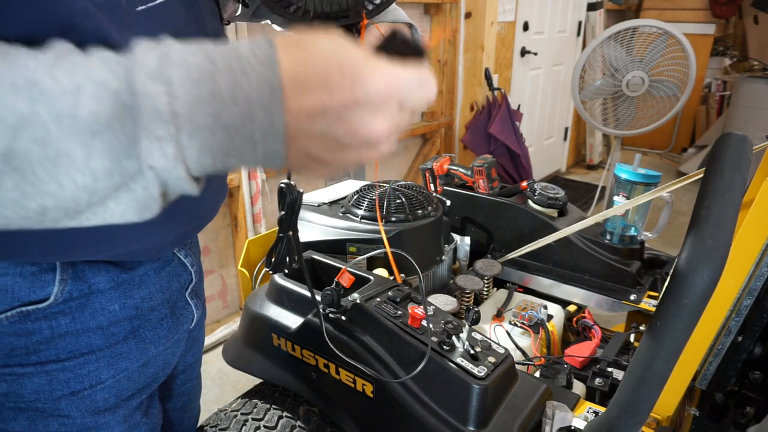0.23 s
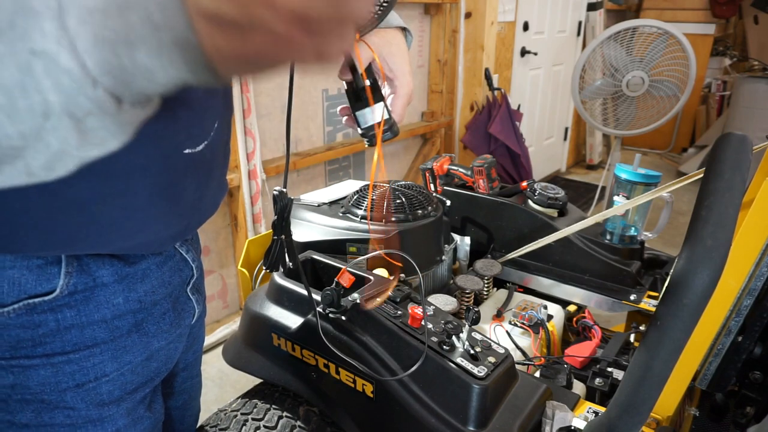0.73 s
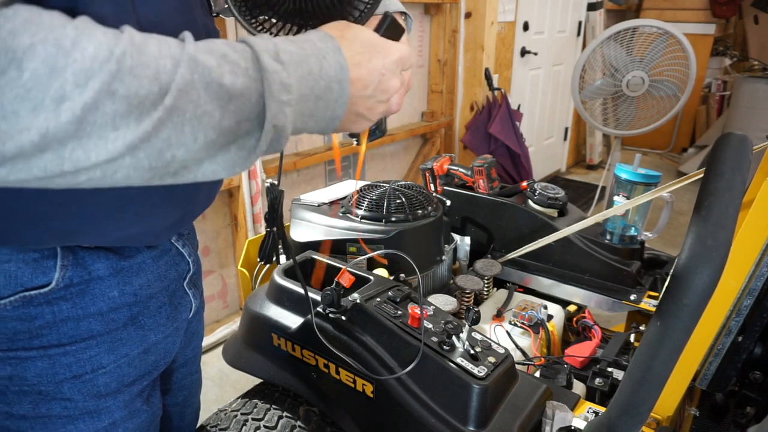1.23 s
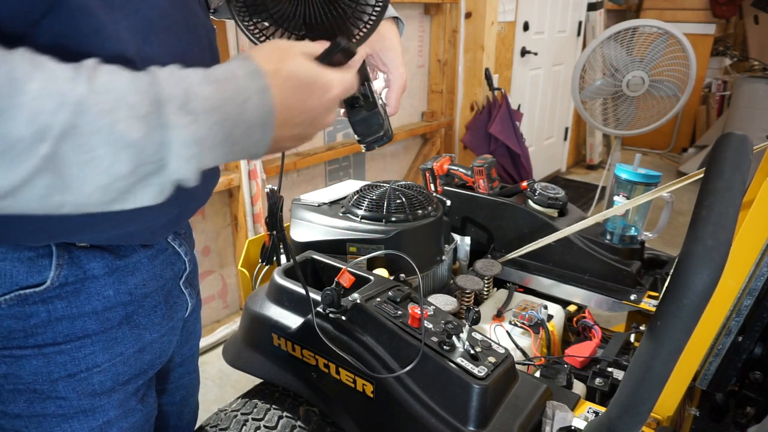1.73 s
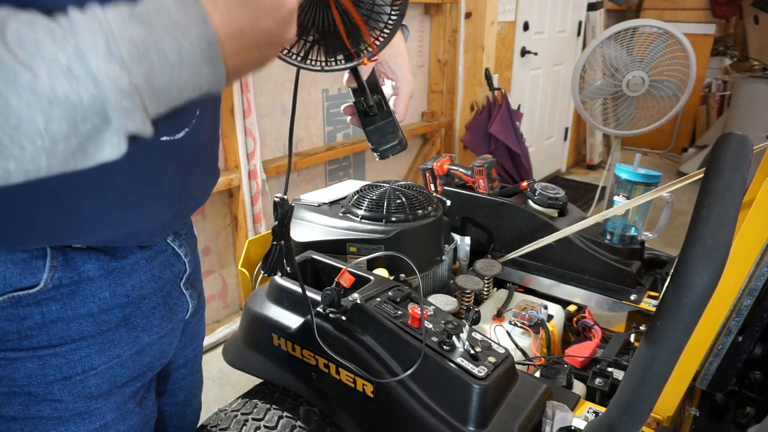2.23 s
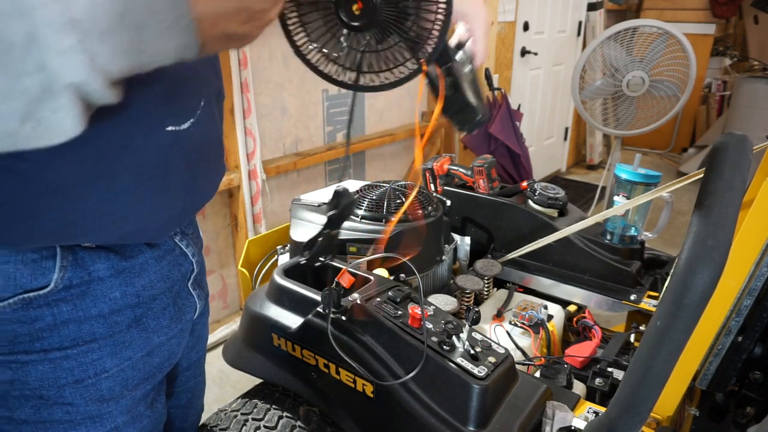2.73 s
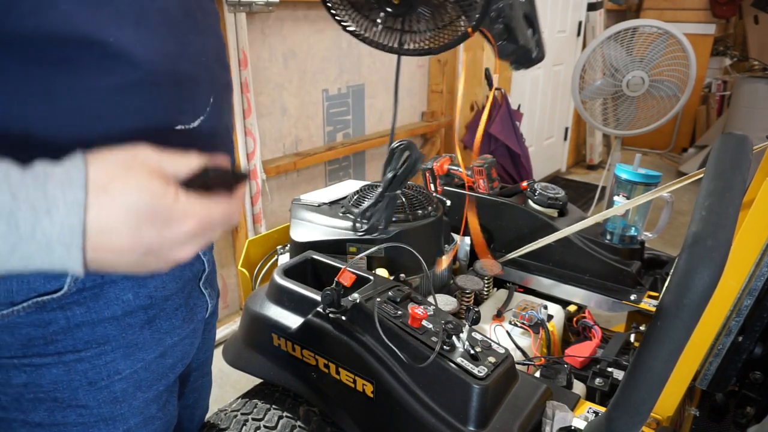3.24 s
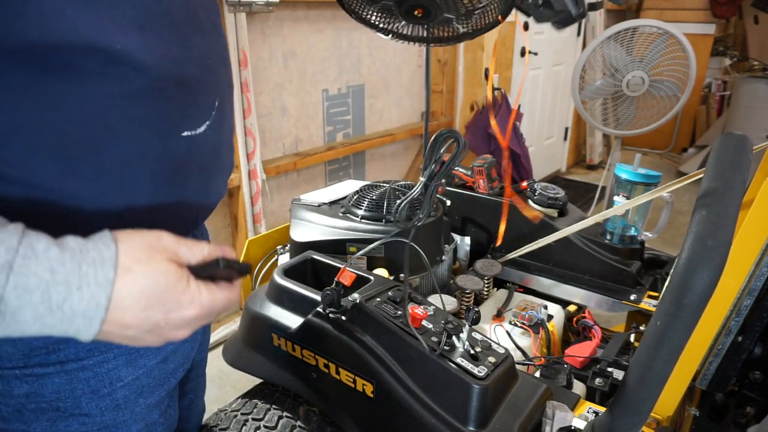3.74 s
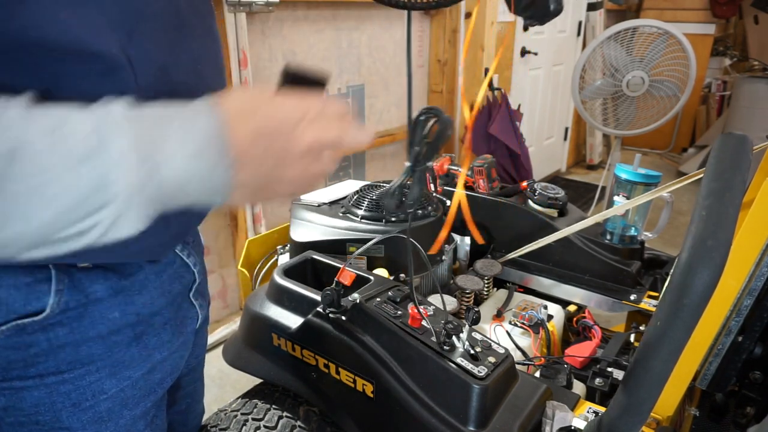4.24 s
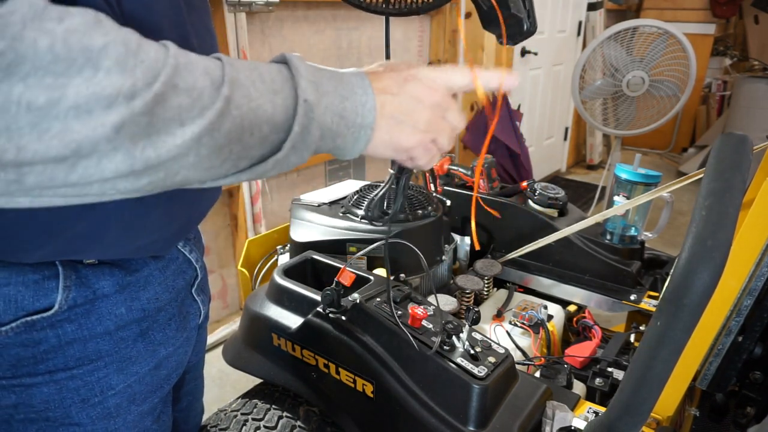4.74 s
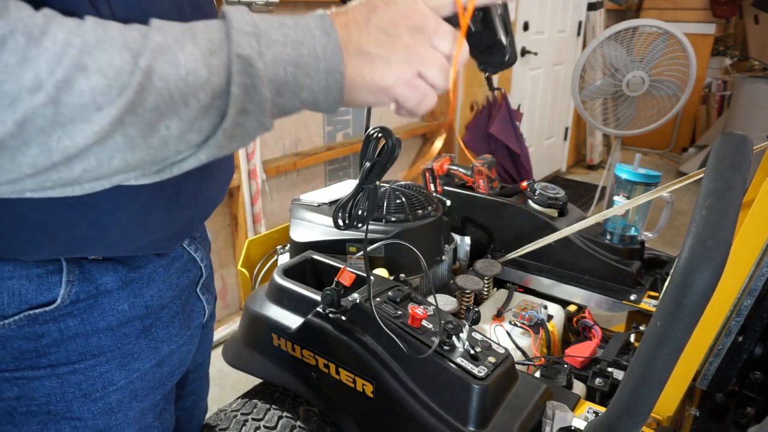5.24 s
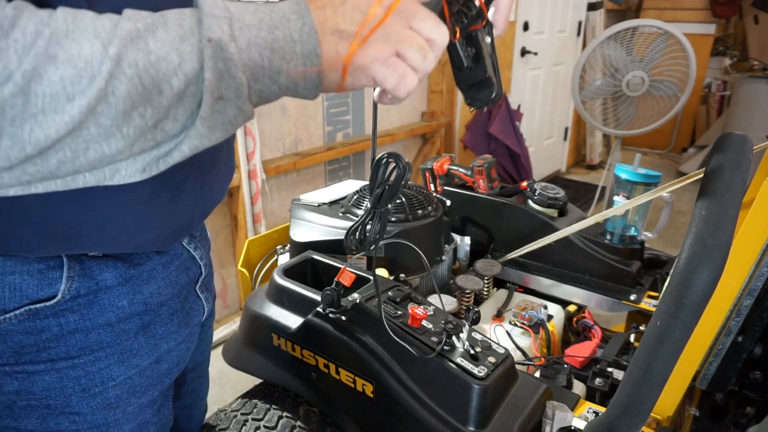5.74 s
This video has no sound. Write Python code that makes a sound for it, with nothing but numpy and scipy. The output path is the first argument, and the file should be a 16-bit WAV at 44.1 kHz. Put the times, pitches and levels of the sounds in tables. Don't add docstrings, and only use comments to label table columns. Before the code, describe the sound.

A small handheld electric fan runs throughout, close to a stereo microphone in a garage. Airy blade hiss covers a faint motor hum, a fast dry ticking and a nasal drone that swells irregularly. Two small plastic clicks come in the first second and a half; around two and three seconds the airstream thumps low against the microphone. Afterwards the hiss is brighter and nearer.

```python
import sys
import numpy as np
from scipy import signal
from scipy.fft import rfft, irfft
from scipy.io import wavfile
from scipy.ndimage import uniform_filter1d

SR = 44100
rng = np.random.default_rng(int(sys.argv[2]) if len(sys.argv) > 2 else 0)


def wrap_up_sound(samples):
    columns = np.atleast_2d(samples).T
    tamed = np.clip(columns, -1, 1)
    steps = np.round(tamed * 32767).astype(np.int16)
    wavfile.write(sys.argv[1], SR, steps)


def volts_from_db(level):
    exponent = np.asarray(level, float) / 20
    return 10 ** exponent


N = 263277
T = np.arange(N) / SR

# t/s, air level/dB, treble of the air/dB, left over right/dB
FACING = [(0, -46.5, -48.5, 3.5), (.3, -47, -50.5, 4), (.6, -44, -53, 3), (.95, -46, -53.5, 3.5),
          (1.3, -45.5, -48.5, 4), (1.6, -43.5, -50, 4.5), (2.0, -45, -48, 4), (2.6, -44.5, -51, 2),
          (2.82, -43.5, -51, 2), (3.05, -41.5, -47, 2.4), (3.5, -45, -49, 1), (4.0, -46.5, -50, 1.5),
          (4.28, -41, -44, 2), (4.9, -40.5, -47, 2), (5.2, -40.5, -47, 1), (5.55, -42.5, -48.5, 1.7),
          (5.97, -41, -47.5, 1.2)]
# f/Hz, density/dB
AIR_AWAY = [(20, -41), (120, -40), (270, -24.5), (355, -13.5), (432, -15.5), (520, -8.5), (1000, 2.5),
            (1150, -2), (1900, -1), (3600, -3), (4600, -8), (5000, -12), (7050, -22), (9300, -19)]
# f/Hz, density/dB
AIR_NEAR = [(20, -35), (120, -38), (277, -26.5), (489, -11.5), (900, -4.5), (1280, -5.5), (1810, -0.5),
            (2050, -5.5), (2600, -4), (3400, -6.5), (4600, -9), (5000, -13.5), (7230, -23), (9300, -20.5)]
# t/s, shadow level/dB
SHADOW = [(0, -4.5), (.95, -6.5), (3.0, -6), (3.85, -7.5), (4.3, -6.5), (5.97, -6)]
# f/Hz, correlation/1
SAME = [(60, 0.94), (130, 0.86), (270, 0.54), (570, 0.57), (1220, 0.78), (2590, 0.91), (5500, 0.59),
        (11700, 0.3)]
# f/Hz, left over right/dB
LEAN = [(60, -0.5), (170, -0.5), (490, 1.5), (1420, 0), (4070, 4), (11700, -0.5)]

SHAFT_HZ = 41.15
# t/s, lag/turns
SHAFT_LAG = [(0.0, 0.03), (0.6, 0.085), (1.1, 0.165), (1.5, 0.18), (2.15, 0.28), (2.45, 0.275),
             (3.05, 0.37), (3.8, 0.385), (4.25, 0.3), (4.75, 0.26), (5.15, 0.185), (6.0, 0.192)]
# shaft order/1, early level/dB, late level/dB
TONES = [(3, -93, -93), (15, -68, -71), (21, -63, -61), (22, -68, -58), (25, -63, -62), (34, -70, -63),
         (37, -68, -64), (39, -62, -59), (42, -64, -59), (45, -62, -54), (54, -62, -64), (60, -60, -57),
         (110, -72, -64), (111, -72, -62)]
# start t/s, length/s, shaft order/1, level/dB
GRIPS = [(-.15, .5, 9, -58.5), (.55, .17, 9, -62), (1.0, .18, 9, -66), (1.5, .15, 9, -60),
         (2.7, .2, 9, -66), (3.07, .2, 9, -59), (-.3, 1.75, 12, -63.5), (1.5, .7, 12, -63),
         (2.15, .45, 12, -53), (2.4, .55, 12, -57), (4.4, .22, 12, -61), (5.05, .3, 12, -60.5),
         (5.48, .4, 12, -64)]

# start t/s, length/s, peak level/dB, centre f/Hz
SWELLS = [(0.0, 0.063, -43.5, 965), (0.464, 0.14, -47, 956), (0.668, 0.32, -45, 985),
          (1.39, 0.11, -47, 1020), (1.558, 0.4, -43, 1014), (2.25, 0.13, -46.5, 1004),
          (2.465, .25, -38, 1017), (2.696, 0.24, -48, 1066), (3.085, .3, -41.5, 900),
          (3.304, 0.51, -44, 1000), (4.16, 0.13, -46, 1010), (4.27, .36, -42.5, 1000),
          (4.658, 0.083, -41, 1070), (4.998, 0.52, -45.5, 1030), (5.43, 0.23, -43.5, 1080),
          (5.75, 0.38, -44, 918)]
DRONE_REST_DB, DRONE_REST_HZ = -57.5, 985

# place/turns, then level/dB in the snap, cage, low cage, rim
TOUCHES = [
    (0, 14.5, 4, 8, 10.5),
    (.13, -2, -12, -10, -5.5),
    (.35, -10.5, -14, -12, 3),
    (.46, -41, -16, -22, -4),
    (0.719, -7.5, 4, -6, -17),
    (.87, 1.5, 0, -0.5, -6),
]
# part/1 (0 snap, 1 cage, 2 rim), f/Hz, width/Hz, level/dB, lag/turns, scrape length/s
TICK_MODES = [
    (0, 9350, 850, 0, -.025, 0.0005),
    (1, 4430, 680, -0.5, 0.0089, 0.00067),
    (1, 2100, 1100, -4, 0.00083, 0.00073),
    (2, 5900, 1570, 0.5, -0.0153, 0.00065),
]
# t/s, level/dB
SNAP = [(.2, -58.5), (.64, -60.5), (1.12, -61.5), (1.44, -50.5), (1.78, -55), (1.95, -62), (2.24, -58.5),
        (2.6, -72), (3.0, -54), (3.22, -62), (3.5, -57), (3.97, -51.5), (4.08, -62), (4.6, -59),
        (4.9, -51.5), (5.28, -52.5), (5.42, -50), (5.97, -58.5)]
# t/s, peak level/dB
SHARP = [(0.7472, -57), (0.7544, -66), (1.3374, -64), (1.3624, -66), (1.4611, -62), (1.5015, -63),
         (1.5344, -62), (1.5828, -63), (1.7789, -61), (1.8294, -73), (3.8965, -62), (3.9444, -64),
         (3.9674, -61), (3.9898, -55), (4.0168, -52), (4.8618, -84), (4.9377, -57), (5.1058, -57),
         (5.1257, -61), (5.2994, -66), (5.3981, -65), (5.4226, -64), (5.4465, -59), (5.5204, -66)]
CAGE_AWAY_DB, CAGE_NEAR_DB, RIM_DB, RING_WAVER_DB = -53, -49.5, -56.5, 1.2
RIM_FOLLOWS, CAGE_FOLLOWS = 0.77, .25
TURN_S, TURN_LENGTH_S = 2.54, 0.44
EDGE_HZ = 11050

# t/s, peak level/dB
CLICKS = [
    (0.7482, -24),
    (1.2939, -25),
]
# f/Hz, level/dB, decay by 60 dB/s
CLICK_MODES = [
    [(1010, 2, 0.037), (4800, -3, .006), (8300, -2, 0.0065), (10900, -4, .005), (11800, -8, .004)],
    [(3910, 5, 0.034), (4450, -4, 0.051), (2330, -2.5, 0.037), (6300, -6, .015), (5300, 0, .015)],
]

# start t/s, length/s, level/dB
GUSTS = [
    (2.095, 0.31, -39.5),
    (2.364, 0.093, -44),
    (2.414, 0.24, -47),
    (2.825, 0.24, -37.5),
    (3.027, 0.37, -68),
    (3.298, 0.4, -73),
    (3.527, 0.093, -69),
    (5.74, 0.71, -67),
]
# f/Hz, density/dB
GUST_COLOUR = [(20, -30), (45, -15), (90, 1.5), (150, 0), (250, -4), (330, -7), (450, -14), (650, -28),
               (1000, -30), (2000, -69)]
# t/s, left port lag/ms
CROSSING = [
    (2.18, 0.82),
    (2.21, 0.86),
    (2.34, 1.0),
    (2.38, -0.65),
    (3.05, -0.68),
    (3.15, -0.051),
]
# t/s, peak level/dB, start f/Hz, end f/Hz, length/s
EDDIES = [(2.206, -29, 170, 250, 0.0085), (2.213, -28.5, 280, 327, 0.011), (2.221, -21, 148, 290, 0.022),
          (2.261, -32.5, 149, 217, 0.011), (2.392, -32, 148, 260, 0.0095), (2.489, -31, 149, 296, 0.0089),
          (2.502, -33.5, 250, 150, 0.011), (2.911, -29.5, 304, 332, 0.0068),
          (2.915, -30.5, 350, 198, 0.0136), (2.936, -31, 260, 191, 0.012), (2.963, -44, 200, 160, 0.0095),
          (2.997, -43, 250, 250, 0.0068), (3.267, -43, 388, 388, 0.017)]


def air(patchy_db=0.64, near_from_db=-46.5, near_span_db=6.5):
    frames, hz = N // 256 + 5, np.fft.rfftfreq(1024, 1 / SR)
    frame_s = np.arange(frames) * 256 / SR
    level_db, treble_db, pan_db = curves(FACING, frame_s)
    shadow_db = curves(SHADOW, frame_s)[0]
    a, b, c, d, patches = rng.standard_normal((frames, 513, 5)).T
    patches = evened(uniform_filter1d(uniform_filter1d(patches, 12, 0), 20, 1))
    near = np.clip((level_db - near_from_db) / near_span_db, 0, 1)
    colour = np.outer(read(AIR_AWAY, hz), 1 - near) + np.outer(read(AIR_NEAR, hz), near)
    high = np.clip((hz - 4200) / 1500, 0, 1)[:, None]
    low = np.clip(hz / 900, 0, 1)[:, None]
    shadow = np.exp(-((hz[:, None] - 3200) / 500) ** 2) * (shadow_db - shadow_db.mean())
    swing = low * (1 - high) * (level_db + 44) + high * (treble_db + 55.5)
    field = colour + swing + shadow + patchy_db * patches
    lean = read(LEAN, hz)[:, None] + low * (pan_db - 3.5)
    same = np.clip(read(SAME, hz), -1, 1)[:, None]
    left = a + 1j * b
    right = same * left + np.sqrt(1 - same ** 2) * (c + 1j * d)
    z = np.array([left * volts_from_db(lean / 2), right / volts_from_db(lean / 2)])
    return volts_from_db(-39.5) * evened(signal.istft(z * volts_from_db(field), nperseg=1024, noverlap=768)[1][:, :N])


def shaft():
    return SHAFT_HZ * T - curves(SHAFT_LAG)[0]


def gripped_db(order, rest_db=-72):
    level = volts_from_db(rest_db)
    for s, length, k, db in GRIPS:
        if round(k) == order:
            level = level + volts_from_db(db) * swell(s, length, 0.45, 0.41)
    return 20 * np.log10(level)


def motor(turns, waver_db=2.6, waver_rad=.25, hum_steady=.9):
    late = np.clip((T - 2.9) / 0.35, 0, 1)
    levels = [(9, gripped_db(9) - 3.0), (12, gripped_db(12) - 2.5)]
    levels += [(k, early_db + (late_db - early_db) * late) for k, early_db, late_db in TONES]
    waver, drift = wander(14, count=len(levels)), wander(12, count=len(levels))
    waver[:2] *= hum_steady
    out = 0
    for (k, db), w, d in zip(levels, waver, drift):
        phase = 2 * np.pi * round(k) * turns + waver_rad * np.sqrt(k) * d
        out = out + np.sqrt(2) * volts_from_db(db + waver_db * w) * np.cos(phase)
    return out


def drone(turns, rough=.3, width_hz=80, tooth_db=.5):
    level, centre_hz = volts_from_db(DRONE_REST_DB), DRONE_REST_HZ
    for s, length, db, hz in SWELLS:
        shape = swell(s, length)
        level = level + volts_from_db(db) * shape
        centre_hz = centre_hz + (hz - DRONE_REST_HZ) * shape
    knocks = strikes(turns, .17, 2.0, .002) + .45 * strikes(turns, .70, 2.0, .002)
    drive = evened(knocks) + rough * rng.standard_normal(N)
    body = evened(resonate(resonate(drive, centre_hz, width_hz), centre_hz, 240))
    tooth = np.cos(2 * np.pi * 24 * turns + .5 * wander(8, count=1)[0])
    early = np.clip((3.6 - T) / 2.6, .35, 1)
    return level * volts_from_db(-9.0) * (body + volts_from_db(tooth_db) * early * np.sqrt(2) * tooth)


def ticks(turns, fresh=.55):
    turned = np.clip((T - TURN_S) / TURN_LENGTH_S, 0, 1)
    waver = RING_WAVER_DB * wander(6, count=2)
    treble_db = curves(FACING)[1] + 50
    cage_db = CAGE_AWAY_DB + (CAGE_NEAR_DB - CAGE_AWAY_DB) * turned + CAGE_FOLLOWS * treble_db + waver[0]
    rim_db = RIM_DB + RIM_FOLLOWS * treble_db + waver[1]
    part_db = [curves(SNAP)[0], cage_db, rim_db]
    trains = [strikes(turns, row[0], 1.5, .003) for row in TOUCHES]
    out = 0
    for k, (part, hz, width_hz, db, lag, length) in enumerate(TICK_MODES):
        u = np.arange(300) / SR / length
        shape, grain = np.sqrt(u) * np.exp(-u), rng.standard_normal((len(TOUCHES), 300))
        weighted = [volts_from_db(row[k + 1]) * train for row, train in zip(TOUCHES, trains)]
        alike = sum(signal.oaconvolve(w, shape * g)[:N] for w, g in zip(weighted, grain))
        new = signal.oaconvolve(sum(weighted), shape)[:N] * rng.standard_normal(N)
        ring = evened(resonate(resonate(alike + fresh * new, hz, width_hz), hz, 2 * width_hz))
        out = out + volts_from_db(part_db[round(part)] + db + 0.5) * np.roll(ring, round(lag * SR / SHAFT_HZ))
    return out


def sparks(length=0.00062, lag=-.02):
    out, n, turns = np.zeros((1, N)), round(length * SR), shaft()
    for (s, db), grain in zip(SHARP, rng.standard_normal((len(SHARP), 200))):
        turn = np.interp(s, T, turns)
        on_touch = abs(turn - round(turn)) < .3
        at = np.interp(round(turn) + lag, turns, T) if on_touch else s
        add(out, at, volts_from_db(db + 6) * evened(grain[:n] * np.hanning(n))[None])
    band = signal.firwin(101, [EDGE_HZ - 100, EDGE_HZ + 1200], pass_zero=False, fs=SR)
    return signal.oaconvolve(out, band[None], "same")


def hands():
    out, t = np.zeros((1, N)), np.arange(3000) / SR
    for (s, db), modes in zip(CLICKS, CLICK_MODES):
        ring = sum(volts_from_db(g - 60 * t / t60) * np.sin(2 * np.pi * hz * t) for hz, g, t60 in modes)
        add(out, s, volts_from_db(db - 10) * ring[None])
    return out[0]


def wind(lumpy_db=1.5, unlike=0.6, eddy_lean_db=.3):
    z = rfft(rng.standard_normal((3, N))) * volts_from_db(read(GUST_COLOUR, np.fft.rfftfreq(N, 1 / SR)))
    stream = sum(volts_from_db(db) * swell(s, length, 0.3, 0.69) for s, length, db in GUSTS)
    shared, *own = evened(irfft(z, N)) * stream * volts_from_db(-4.5 + lumpy_db * wander(70, count=1))
    lag = curves(CROSSING)[0] / 1000
    out = np.array([np.interp(T - lag, T, shared), shared]) + unlike * np.array(own)
    for s, db, start_hz, end_hz, length in EDDIES:
        n = round(max(length, .004) * SR)
        angle = 2 * np.pi * np.cumsum(np.linspace(start_hz, end_hz, n)) / SR
        swing = (np.sin(angle) + 0.4 * np.cos(2 * angle)) * signal.windows.tukey(n, .6)
        add(out[:1], s, volts_from_db(db + eddy_lean_db) * swing[None])
        add(out[1:], s - np.interp(s, T, lag), volts_from_db(db - eddy_lean_db) * swing[None])
    return out


def placed(x, wet_db):
    decay = volts_from_db(-60 * np.arange(2600) / SR / 0.1)
    taps = rng.choice([-1., 1.], (2, 2600)) * (rng.random((2, 2600)) < .03) * decay
    taps[:, :60] = 0
    taps = taps / np.linalg.norm(taps, axis=1)[:, None]
    wet = signal.oaconvolve(x[None], taps, axes=1)[:, :N]
    return (x + volts_from_db(wet_db) * wet) * volts_from_db(np.outer([.5, -.5], curves(FACING)[2]))


def thin(x, hz):
    return signal.sosfilt(signal.butter(4, hz, "high", fs=SR, output="sos"), x)


def strikes(turns, place, spread_db, jitter):
    whole = np.arange(1, 245)
    chance = rng.standard_normal((len(whole), 2))
    at = (np.interp(whole + place + jitter * chance[:, 0], turns, T) * SR).astype(int)
    train = np.zeros(N)
    train[np.clip(at, 0, N - 1)] = volts_from_db(spread_db * chance[:, 1])
    return train


def resonate(x, hz, width_hz):
    turn = np.exp(2j * np.pi * np.cumsum(hz * np.ones(N)) / SR)
    r = np.exp(-np.pi * width_hz / SR)
    return 2 * (turn * signal.lfilter([1 - r], [1, -r], x / turn)).real


def swell(start, length, rise=0.21, fall=0.29):
    u = (T - start) / max(length, .02)
    return np.sin(np.pi / 2 * np.clip(np.minimum(u / rise, (1 - u) / fall), 0, 1)) ** 2


def wander(rate_hz, count):
    knots = rng.standard_normal((count, 400))
    return np.array([np.interp(T * rate_hz, np.arange(400), k) for k in knots]) * np.sqrt(3 / 2)


def evened(x):
    return x / np.sqrt(np.mean(x ** 2) + 1e-20)


def read(points, hz):
    f, value = np.transpose(points)
    return np.interp(np.log(hz + 1), np.log(f + 1), value)


def curves(rows, t=T):
    s, *columns = np.transpose(rows)
    return [np.interp(t, s, c) for c in columns]


def add(mix, s, sound):
    part = mix[:, round(s * SR):][:, :sound.shape[1]]
    part += sound[:, :part.shape[1]]


def scene():
    turns = shaft()
    hum = placed(motor(turns) + thin(drone(turns), 440), -14.5)
    small = placed(thin(ticks(turns), 1480), -3.0) + placed(thin(hands(), 480), -4)
    return air() + hum + small + wind()


def roll_off(x):
    return signal.sosfilt(signal.butter(12, 12290, fs=SR, output="sos"), x)


def record(dry):
    limit = signal.firwin(701, EDGE_HZ, window=("kaiser", 6), fs=SR)
    low = signal.oaconvolve(dry, limit[None], "same")
    return roll_off(low + sparks())


dry = scene()
out = record(dry)
wrap_up_sound(out)
```